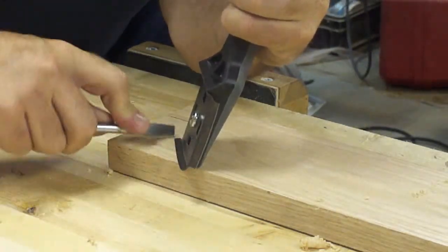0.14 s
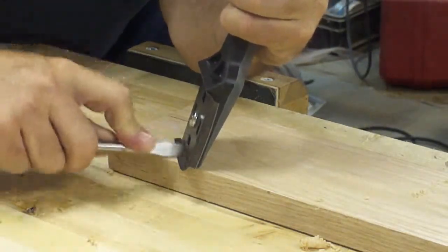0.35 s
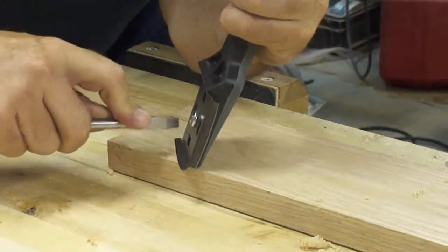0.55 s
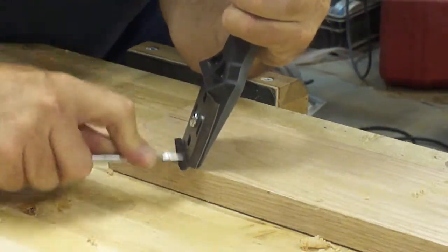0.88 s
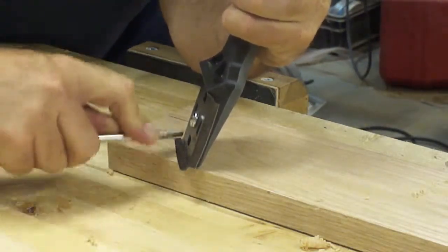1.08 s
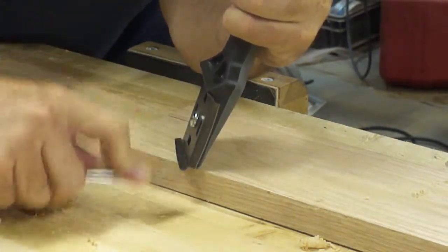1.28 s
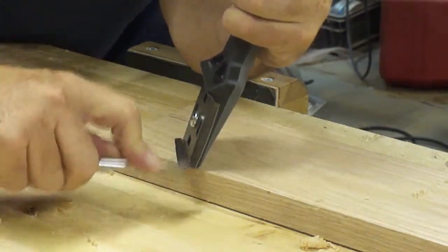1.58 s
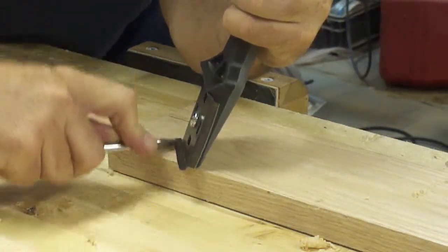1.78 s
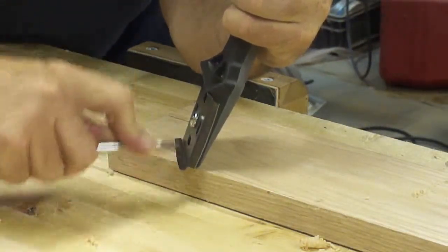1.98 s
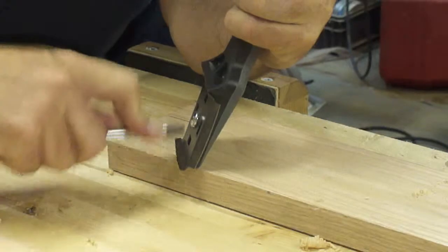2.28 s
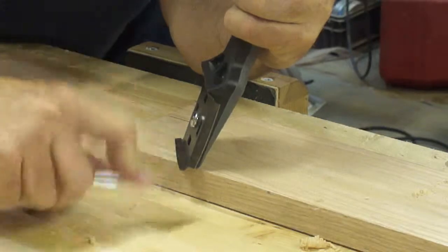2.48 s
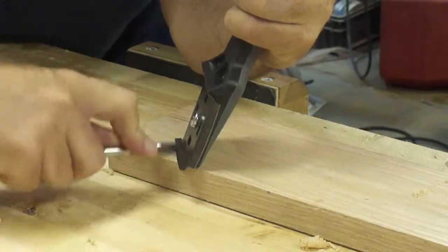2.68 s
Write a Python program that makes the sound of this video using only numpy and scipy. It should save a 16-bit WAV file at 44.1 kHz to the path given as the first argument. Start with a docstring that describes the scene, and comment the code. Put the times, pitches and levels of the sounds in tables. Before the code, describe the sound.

A steel screwdriver shaft strikes a scraper blade about three times a second, most clicks followed by a brief scrape. The blade and the board beneath ring faintly, heard close in a small workshop.

```python
"""Screwdriver striking a scraper blade

A steel screwdriver shaft is struck again and again across a scraper blade held on a board at a bench.
Each stroke lands with a click, and most then slide briefly along the edge; three knocks are harder
and duller. The blade and board ring, the bench top reflects, and a small workshop echoes and hums."""
import sys
import numpy as np
from scipy import signal
from scipy.fft import rfft, irfft
from scipy.io import wavfile

SR = 44100
rng = np.random.default_rng(int(sys.argv[2]) if len(sys.argv) > 2 else 0)


def wav_record(signal):
    """Record a signal, one row per channel, as 16-bit PCM in the file named by sys.argv[1]."""
    frames = np.transpose(np.atleast_2d(signal))
    bounded = np.clip(frames, -1, 1)
    # unit amplitude maps onto the largest positive 16-bit level
    quanta = np.round(bounded * 32767).astype(np.int16)
    wavfile.write(sys.argv[1], SR, quanta)


N = 125685

# Levels are relative: 0 dB changes nothing. A ring time is how long a sound takes to fade by 60 dB.
# A place is a point on the shaft, from 0 (tip) to 1 (middle).
# the bands that set a blow's tone: (frequency [Hz])
BLOW_BANDS_HZ = [150, 520, 1000, 1700, 3000, 6000, 10000]
# the blows: (time [s], place [0-1], board knock [dB], bench thump [dB], clink [dB], 7 band levels [dB])
BLOWS = [(0.0663, 0, 2, 11, -3, -2.5, -6, -4, -6, 2.5, 2, 1.5),
         (0.1836, .8, 2, -18, 1, -2.5, 3.5, 7, 3.5, 2, -10, -22),
         (0.3876, 0, -4.5, 13, 1.5, 2, 2.5, -1.5, -2, 2.5, 4, -1),
         (0.4944, .8, 5, -16, -13, -2.5, 3, 8, 6.5, 9, -2.5, -11),
         (0.8652, 1, -5.5, -12, -5, 1.5, -0.5, 2, 1, 5, -5, -3.5),
         (1.1846, .7, -1, 20, 7, 0, -2.5, -2, 2, 3.5, -3.5, 2),
         (1.5189, 0.68, 0, 0, 0, 0.5, 10.5, -3, 5.5, 6, 3.5, -4.5),
         (1.8209, 0.64, 0.5, -12, -11, -0.5, 8, 1, -3, -5, -4.5, -5.5),
         (2.146, 0.93, -1.5, 8, -24, 7, -3.5, 7, 5, 7, 0.5, 2),
         (2.4189, 0.94, -2.5, 21, 3.5, 4, -4.5, 3, 3, 5, -3.5, 1.5),
         (2.7097, 0.6, -1.5, 4, -18, 1, 10.5, 11, 13, 6, -0.5, -10.5),
         (1.563, 1, -9, 0, -10, -17, -3, 0, 4.5, -6, -5, -19)]
# a stroke that is still ringing when the scene opens: (age [s], place [0-1], level [dB])
FADING_STROKE = (.14, 0.99, 4.7)
# tone of the steel-on-steel click: (frequency [Hz], level [dB])
CLICK_TONE = [(25, -17), (100, -14), (400, -12), (700, -4), (1000, 15), (1300, -7), (2000, 7.5),
              (2500, -3.5), (3000, 0.5), (3700, -7), (5000, 0), (6200, -1.5), (7500, -5), (11000, -16)]
# broad resonances that depend on the place: (frequency [Hz], level at tip [dB], level at middle [dB])
TONE_BY_PLACE = [(700, 0, 0.5), (766, -2, -1.5), (917, -3, 2), (1127, 1.5, 0), (1310, -3, -4),
                 (1520, -3.5, 1), (1650, -4, 1), (1855, -1.5, 3), (2110, 4.5, -3.5), (2470, -1, 1),
                 (2710, -4.5, 3), (3080, 3, 0), (3570, -1.5, -1.5), (4300, -1, 3), (5130, 0.5, -2),
                 (5570, -3.5, 0), (6250, 0.5, -0.5), (7200, -0.5, 0)]
# the blade's brief, bright clink: (frequency [Hz], level [dB], ring time [s])
CLINK_MODES = [(4737, -29.5, .018), (5780, -33, 0.0023), (6080, -28.5, 0.013), (8600, -40, 0.0083)]
# blade and shaft ringing: (frequency [Hz], level at tip [dB], level at middle [dB], ring time [s])
STEEL_MODES = [(910, -40, -33, .2), (948, -33, -24, .3), (988, -37, -27, .28), (1033, -23, -30, .3),
               (1120, -31, -39, .16), (1433, -43, -29, .24), (1528, -44, -37, .24), (1802, -39, -28, .28),
               (1876, -39, -37, .22), (1962, -26, -29, .28), (2106, -25, -35, .28), (2200, -30, -46, .22),
               (2790, -46, -37, .16), (3030, -36, -41, .28), (3140, -36, -41, .28), (4274, -44, -36, .36),
               (6480, -42, -47, .24)]
# board and bench ringing: (frequency [Hz], level [dB], ring time [s])
WOOD_MODES = [(129, -61, .9), (168, -54, .4), (241, -43, .45), (320, -50, .3), (424, -46, .45),
              (464, -44, .45), (523, -48, .22), (548, -49, .22), (632, -34, .22)]
# the bench thumps as it takes the push: (frequency [Hz], level [dB], ring time [s])
THUMP_MODES = [(45, -54.5, 0.013)]
# slides along the edge: (start [s], hardest press [s], end [s], level at start [dB],
# level at press [dB], midrange [dB], treble [dB], catch [dB])
EDGE_SLIDES = [(0.073, 0.16, 0.21, -6, -1, -3, -5, -24), (0.396, 0.462, 0.489, -6.5, 3.5, 3, -4.5, -18),
               (0.877, 0.96, 0.98, -6, 2, 1, -0.5, -7.5), (1.198, 1.255, 1.304, -6, 6.5, -3.5, 0.5, -3),
               (1.527, 1.572, 1.667, -5.5, 0.5, -4.5, -2, -0.5),
               (1.879, 1.897, 1.914, 0.5, 7.5, 2.5, 3.5, -12), (2.159, 2.206, 2.264, -3, 1.5, 5, 0.5, -8),
               (2.425, 2.49, 2.53, -4, 0.5, 5, 3, -5.5), (2.784, 2.824, 2.845, -5.5, 3.5, 4.5, 1, -8)]
# tone shared by all slides: (frequency [Hz], level [dB])
SCRAPE_TONE = [(200, -5.5), (500, -0.5), (1000, -10), (2000, -4.5), (3000, -0.5), (6500, -3), (10000, -9)]
# echoes from the bench top and nearby things: (delay [s], level [dB])
NEAR_ECHOES = [(.0053, -2.5), (.0077, -1), (.0098, -6), (0.0155, -20), (0.028, -10.5)]
# tone of those echoes: (frequency [Hz], level [dB])
NEAR_ECHO_TONE = [(300, -3.5), (1200, 4.5), (3000, -11), (6000, -8.5), (11000, -16.5)]
# tone of the room's answer to a click: (frequency [Hz], level [dB])
ROOM_TONE = [(60, -16.5), (130, -8.5), (240, 7), (350, 3), (480, 10), (780, 6), (950, 12.5), (1130, 13),
             (1310, 10), (1450, 16), (1650, 9.5), (1950, 11.5), (2450, 4.5), (3050, 7.5), (3600, -3),
             (4500, 1.5), (5400, -0.5), (6400, 0), (7400, -8), (11000, -12)]
# how long the room rings: (frequency [Hz], ring time [s])
ROOM_RING_TIMES = [(150, 0.99), (400, 0.48), (1000, 0.35), (2800, 0.32), (7000, 0.38), (11000, .28)]
# tone of the steady background noise: (frequency [Hz], level [dB])
AIR_TONE = [(25, -49), (70, -23), (125, 0.5), (240, -13.5), (420, 0.5), (700, -6.5), (1000, -2.5),
            (2000, -10.5), (4000, -19), (7000, -27), (11000, -31.5)]
# the faint hum: (frequency [Hz], level [dB])
HUM_TONES = [(129, -64), (241, -62)]

CLICK_DB, CHATTER_DB, CHATTER_FADE_S = -2.5, 1.5, 0.0049  # chatter: the rattle just after a click
STEEL_DB, WOOD_DB, RING_RISE_S = -7.5, -1, 0.0016
SLIDE_DB, SLIDE_FADE_DB, SWELL_POWER = -29, -15.5, 2.8
SLIPS_PER_S, SLIP_SPREAD_DB = 3000, 3.5
CLICK_IN_ROOM_DB, RING_IN_ROOM_DB, ROOM_RISE_S = -1, -9, 0.0042
AIR_DB, TREBLE_LIMIT_HZ = -51, 11080


def strikes():
    """The shaft lands on the blade; where and how hard it lands sets the tone of the blow."""
    out, t = np.zeros(N), np.arange(SR // 2) / SR
    for start, place, knock_db, thump_db, clink_db, *bands_db in BLOWS:
        blow_tone = list(zip(BLOW_BANDS_HZ, bands_db))
        add(out, start, colour(contact(place, knock_db, clink_db), blow_tone))
        add(out, start, amp(thump_db) * ring(THUMP_MODES, t))
    age, place, db = FADING_STROKE
    add(out, 0, amp(db) * contact(place, knock_db=0, clink_db=0)[round(age * SR):])
    return out


def contact(place, knock_db, clink_db):
    """One touch of steel on steel clicks and sets the blade and board ringing; the room answers."""
    t = np.arange(SR // 2) / SR
    impulse = t == 0
    chatter = rng.standard_normal(len(t)) * np.exp(-t / CHATTER_FADE_S)
    chatter *= amp(CHATTER_DB) / np.linalg.norm(chatter)
    click = amp(CLICK_DB) * colour(impulse + chatter, CLICK_TONE)
    click += amp(clink_db) * ring(CLINK_MODES, t)
    clack = click + bench_echoes(click) + amp(CLICK_IN_ROOM_DB) * colour(room_tail(t), ROOM_TONE)
    place_tone = [(hz, tip + (middle - tip) * place) for hz, tip, middle in TONE_BY_PLACE]
    steel_modes = [(hz, tip + (middle - tip) * place, ring_s) for hz, tip, middle, ring_s in STEEL_MODES]
    steel = amp(STEEL_DB) * ring(steel_modes, t)
    wood = amp(WOOD_DB + knock_db) * ring(WOOD_MODES, t)
    ringing = (steel + wood) * (1 - np.exp(-t / RING_RISE_S))
    ringing_in_room = amp(RING_IN_ROOM_DB) * signal.fftconvolve(ringing, room_tail(t))[:len(t)]
    return colour(clack, place_tone) + ringing + ringing_in_room


def ring(modes, t):
    """A struck object rings with fading pure tones (modes); neighbours start in opposite directions."""
    return sum((-1) ** k * amp(db - 60 * t / ring_s) * np.sin(2 * np.pi * hz * t)
               for k, (hz, db, ring_s) in enumerate(modes))


def slides(spot_count=3):
    """Tiny slips at a few spots on the edge swell as the shaft presses in; it catches once and leaves."""
    out, t = np.zeros(N), np.arange(SR // 4) / SR
    for start, press, end, start_db, press_db, middle_db, treble_db, catch_db in EDGE_SLIDES:
        # each slip is one tiny push of random direction and size
        directions = np.sign(rng.standard_normal(len(t)))
        slipping = rng.random(len(t)) < SLIPS_PER_S / SR
        sizes = amp(SLIP_SPREAD_DB * np.minimum(rng.exponential(1, len(t)), 4))
        slips = directions * slipping * sizes
        pressing = np.clip(t / (press - start), 0, 1) ** SWELL_POWER
        leaving = np.maximum(start + t - press, 0) / (end - press)
        level_db = SLIDE_DB + start_db + (press_db - start_db) * pressing + SLIDE_FADE_DB * leaving
        force = amp(level_db) * (start + t < end) * slips / np.std(slips)
        # each slip sets off the contact sound of one of the spots
        spot = rng.integers(0, spot_count, len(t))
        touches = [contact(place=0.53, knock_db=-6.5, clink_db=-7) for _ in range(spot_count)]
        scrape = sum(signal.fftconvolve(force * (spot == k), touch) for k, touch in enumerate(touches))
        add(scrape, press - start, amp(catch_db) * touches[0])
        own_tone = [(500, 0), (1000, middle_db), (2000, 0), (5000, treble_db)]
        add(out, start, colour(colour(scrape, SCRAPE_TONE), own_tone))
    return out


def bench_echoes(click):
    """The bench top and nearby things throw back duller copies of the click."""
    echoes = np.zeros(len(click))
    for delay, db in NEAR_ECHOES:
        add(echoes, delay, amp(db) * click)
    return colour(echoes, NEAR_ECHO_TONE)


def room_tail(t, size=256):
    """The room's many echoes blur into noise that builds fast and fades at its own speed in each band."""
    hz, times, bands = signal.stft(rng.standard_normal(len(t)), SR, nperseg=size)
    fade = amp(-60 * times / look_up(ROOM_RING_TIMES, hz)[:, None])
    _, tail = signal.istft(bands * fade, SR, nperseg=size)
    tail = tail[:len(t)] * (1 - np.exp(-(t / ROOM_RISE_S) ** 2))
    return tail / np.linalg.norm(tail)


def workshop():
    """Steady room noise with a faint hum."""
    t = np.arange(N) / SR
    air_gain = amp(look_up(AIR_TONE, np.fft.rfftfreq(N, 1 / SR)))
    air = irfft(rfft(rng.standard_normal(N)) * air_gain, N)
    hum = sum(amp(db) * np.sqrt(2) * np.sin(2 * np.pi * (hz * t + rng.random())) for hz, db in HUM_TONES)
    return amp(AIR_DB) * air / np.std(air) + hum


def amp(db):
    """Turns decibels into a number to multiply a sound by."""
    return 10 ** (np.asarray(db) / 20)


def look_up(points, hz):
    """Reads between the rows of a (frequency [Hz], value) table, with octaves evenly spaced."""
    frequencies, values = np.transpose(points)
    return np.interp(np.log(hz + 1), np.log(frequencies + 1), values)


def add(mix, start_s, sound):
    """Mixes a sound in at the given time."""
    part = mix[max(round(start_s * SR), 0):][:len(sound)]
    part += sound[:len(part)]


def colour(sound, tone, size=4096):
    """Filters a sound to follow a (frequency [Hz], level [dB]) curve."""
    log_gain = np.log(amp(look_up(tone, abs(np.fft.fftfreq(size, 1 / SR)))))
    response = np.exp(np.conj(signal.hilbert(log_gain)))  # rings only after a hit, never before it
    taps = np.fft.ifft(response).real[:size // 2]
    return signal.fftconvolve(sound, taps)[:len(sound)]


def scene():
    """Strikes and slides over the workshop's background, in one channel."""
    return (strikes() + slides() + workshop())[None]


def record(dry):
    """Cuts away the very highest treble."""
    low_pass = signal.firwin(511, TREBLE_LIMIT_HZ, window=("kaiser", 9), fs=SR)
    return signal.oaconvolve(dry, low_pass[None], "same")


dry = scene()
out = record(dry)
wav_record(out)
```